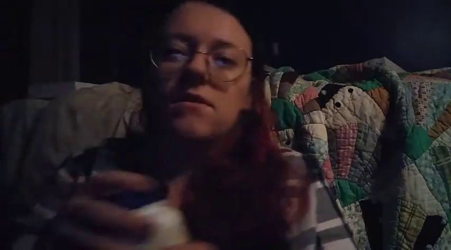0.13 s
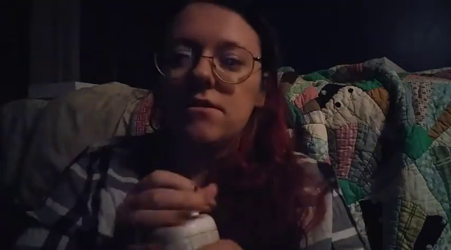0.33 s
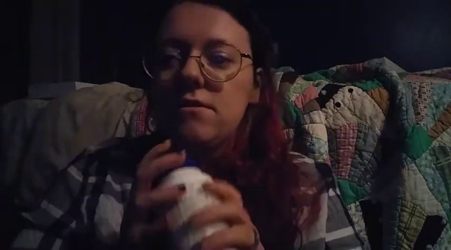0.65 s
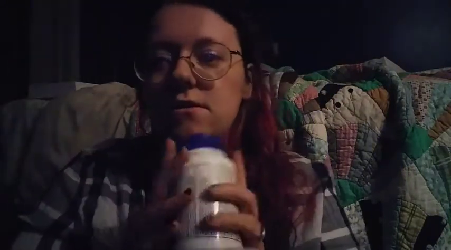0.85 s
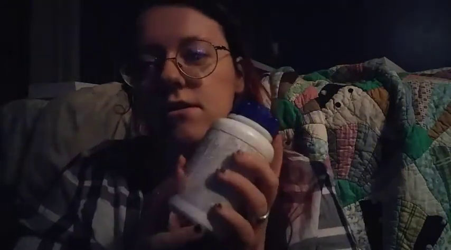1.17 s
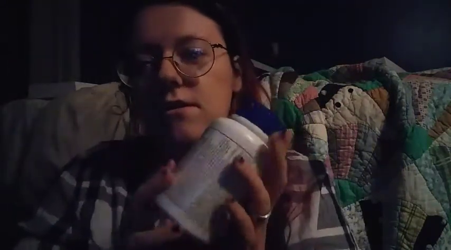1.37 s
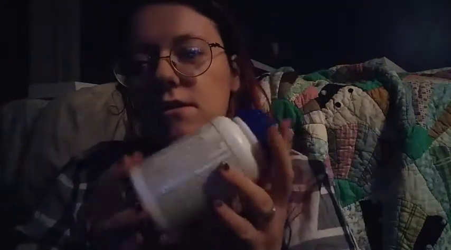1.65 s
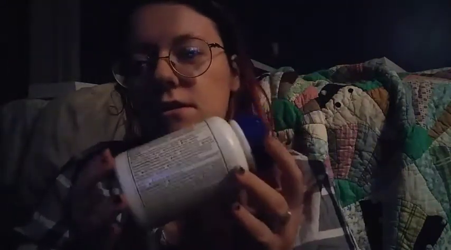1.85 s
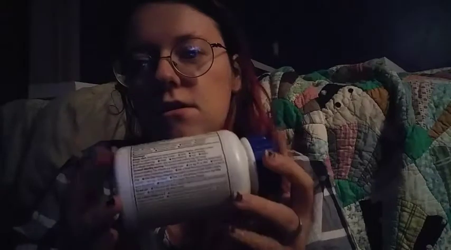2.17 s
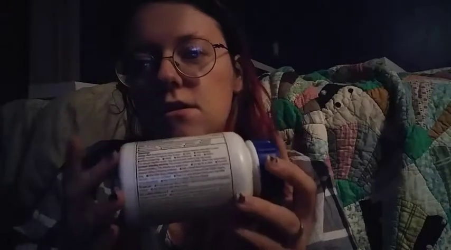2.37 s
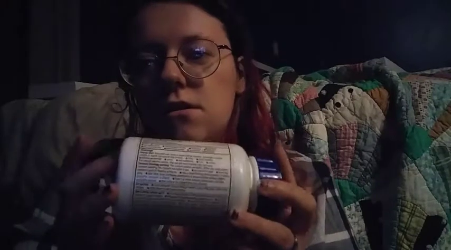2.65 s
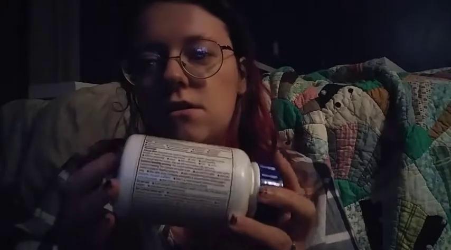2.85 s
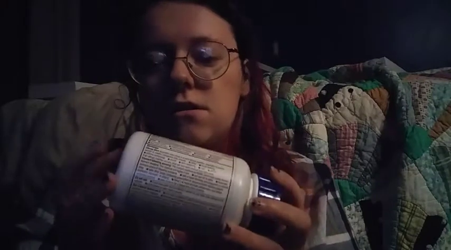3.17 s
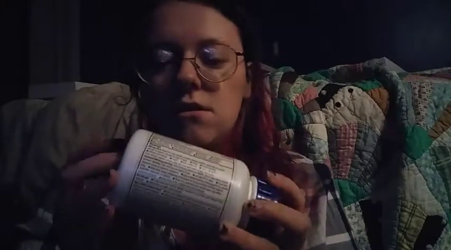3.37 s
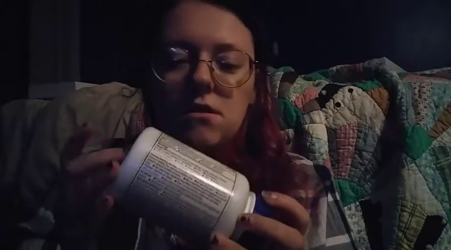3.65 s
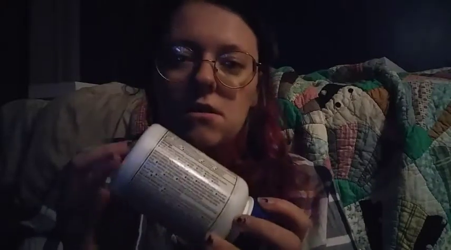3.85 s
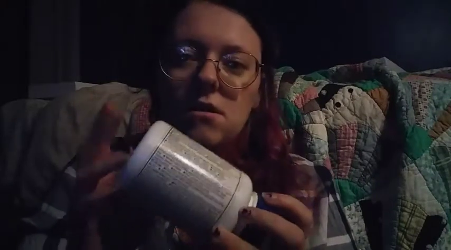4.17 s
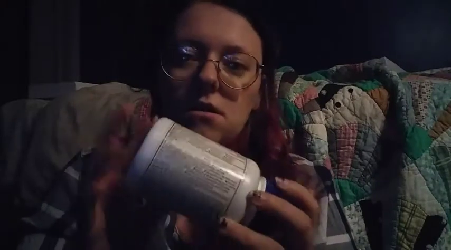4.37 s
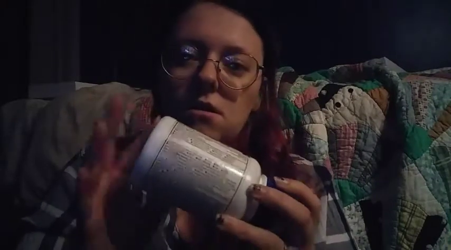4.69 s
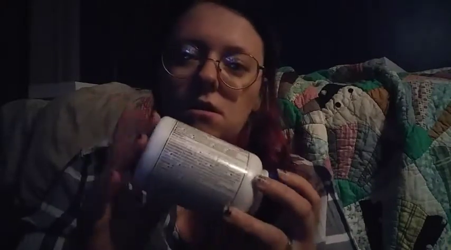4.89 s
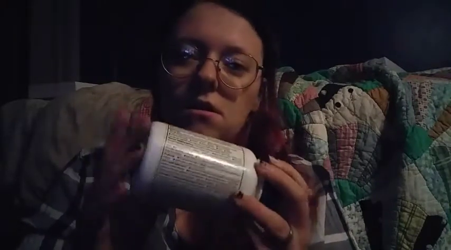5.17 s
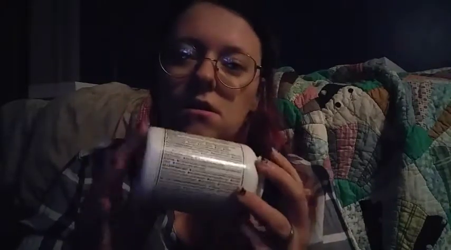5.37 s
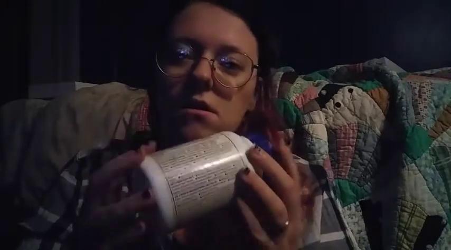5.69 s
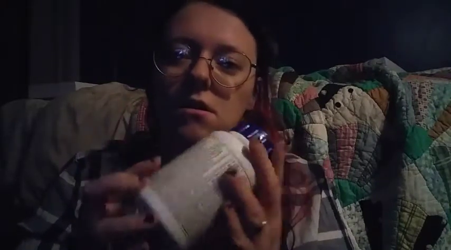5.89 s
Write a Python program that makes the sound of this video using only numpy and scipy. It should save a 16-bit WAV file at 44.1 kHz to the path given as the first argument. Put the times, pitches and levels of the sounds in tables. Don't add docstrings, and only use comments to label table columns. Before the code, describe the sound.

A laptop-type microphone catches fingers and nails on a hard plastic bottle of pills. It knocks, ticks and rattles as it is turned, label skin-noise rasping in short strokes. Later the base drums with hollow mid-pitched taps, one sharp and loud. The handling thins to tiny clicks before a last burst. Low fan noise pulses through a noise gate, with a very short dull room tail.

```python
import sys
import numpy as np
from scipy import signal
from scipy.fft import rfft, irfft
from scipy.io import wavfile
from scipy.ndimage import uniform_filter1d

SR = 44100
rng = np.random.default_rng(int(sys.argv[2]) if len(sys.argv) > 2 else 0)


def linear_from_db(decibels):
    return 10 ** (np.asarray(decibels, float) / 20)


def unload_wav(signal):
    wavfile.write(
        sys.argv[1],
        SR,
        np.round(np.clip(np.atleast_2d(signal).T, -1, 1) * 32767).astype(np.int16),
    )


N = 265923


def at(table, column):
    rows = np.array(table)
    return np.interp(np.arange(N) / SR, rows[:, 0], rows[:, column])


def colour(x, points):
    hz, db = np.transpose(points)
    f = np.fft.rfftfreq(len(x), 1 / SR) + 1
    gain_db = np.interp(np.log(f), np.log(hz), db)
    y = irfft(rfft(x) * linear_from_db(gain_db), len(x))
    return y / np.std(y)


def response(points):
    hz, db = np.transpose(points)
    f = np.fft.rfftfreq(2048, 1 / SR) + 1
    gain_db = np.interp(np.log(f), np.log(hz), db)
    cepstrum = irfft(np.log(linear_from_db(gain_db)))
    cepstrum[1:1024] *= 2
    cepstrum[1025:] = 0
    return irfft(np.exp(rfft(cepstrum)))[:512]


def walk(rate_hz):
    hold = int(SR / rate_hz)
    levels = np.repeat(rng.standard_normal(N // hold + 1), hold)
    return uniform_filter1d(levels, hold)[:N]


def modes(hz, db, t60_s, phase_cycles):
    t = np.arange(2048)[:, None] / SR
    sines = np.sin(2 * np.pi * (hz * t + phase_cycles))
    y = (linear_from_db(db - 60 * t / t60_s) * sines).sum(axis=1)
    return y / np.abs(y).max()


def add(out, start_s, sound):
    i = max(int(start_s * SR), 0)
    out[i:i + len(sound)] += sound[:max(len(out) - i, 0)]


ROOM_T60_S, ROOM_DB = 0.14, -11


def room(x, db):
    t = np.arange(8192) / SR
    tail = colour(rng.standard_normal(8192), [(200, -17.5), (1500, -6.5), (6000, -5.0), (12000, -4.0)])
    tail = tail * linear_from_db(-60 * t / ROOM_T60_S) * np.clip(t / 0.014, 0, 1)
    tail = tail / np.sqrt(np.sum(tail ** 2))
    return x + linear_from_db(db) * signal.fftconvolve(x, tail)[:N]


# hz, density_db (per Hz)
FAN_SPECTRUM = [(25, -39), (50, -20), (70, -4.5), (125, 0.5), (280, -3.5), (490, -1.5), (800, -6),
                (1400, -12), (2000, -14.5), (3000, -16), (6500, -22.5), (9000, -49), (15500, -56.5)]
# hz, density_db (per Hz)
DUCT_RESONANCE = [(1430, -21.5), (1600, 2), (1680, 5.5), (1760, -2.5), (1950, -27.5)]
# time_s, level_above_fan_db
WHISTLE_LEVEL = [(0, -16), (.8, -4), (.95, -10.5), (1.2, -8.5), (1.45, -3.5), (1.6, -8), (1.8, -15.5),
                 (2.4, -4), (2.5, -15), (2.7, -12), (2.8, -6), (3.1, -18), (3.2, -3.5), (3.6, -4.5),
                 (3.7, -15.5)]
# time_s, fan_db
FAN_LEVEL = [(0, -68), (.2, -61), (.3, -62), (.42, -70.5), (.6, -59.5), (1.5, -61.5), (2.0, -61.5),
             (2.1, -60.5), (2.45, -59), (2.6, -63), (2.7, -61), (3.05, -57), (3.2, -61), (4.3, -58),
             (4.5, -64), (5.45, -66), (5.6, -64.5), (6.0, -61.5)]


def fan():
    hum = colour(rng.standard_normal(N), FAN_SPECTRUM)
    whistle_db = at(WHISTLE_LEVEL, 1) + 1.1 * walk(22)
    whistle = linear_from_db(whistle_db) * colour(rng.standard_normal(N), DUCT_RESONANCE)
    fan_db = at(FAN_LEVEL, 1) + 3.0 + 1.48 * walk(25)
    return linear_from_db(fan_db) * (hum + whistle)


# start_s, length_s, rub_db
STROKES_OF_HANDS = [(0.116, 0.17, -61.5), (0.448, 0.063, -87), (0.587, 0.035, -51.5), (0.886, 0.031, -61.5),
                    (1.045, 0.058, -62), (0.757, 0.66, -61.5), (1.485, 0.18, -69.5), (1.7, 0.058, -63.5),
                    (1.844, 0.046, -68.5), (2.102, 0.25, -52.5), (2.146, 0.13, -46), (2.38, 0.05, -75),
                    (2.66, 0.092, -67), (2.86, 0.09, -60), (3.072, 0.012, -56.5), (3.603, 0.11, -66),
                    (3.812, 0.1, -52), (4.093, 0.22, -63.5), (4.346, 1, -74.5), (5.594, 0.021, -55.5),
                    (5.64, .3, -68), (5.98, .1, -51)]
STROKE_RISE_DB_S, STROKE_FALL_DB_S, RESTING_DB = 211, 150, -81.5


def hands():
    t, power = np.arange(N) / SR, linear_from_db(2 * RESTING_DB)
    for start_s, length_s, rub_db in STROKES_OF_HANDS:
        rise_db = STROKE_RISE_DB_S * np.maximum(start_s - t, 0)
        fall_db = STROKE_FALL_DB_S * np.maximum(t - start_s - length_s, 0)
        power = power + linear_from_db(2 * (rub_db - (rise_db + fall_db)))
    return 10 * np.log10(power)


# hz, density_db (per Hz)
SKIN_HISS = [(700, -9.5), (1500, 10.5), (2500, 3), (4000, 3), (6000, 5), (8000, -0.5), (10000, -5),
             (12000, -43), (15500, -41)]
# hz, density_db (per Hz)
SLIP_GRAINS = [(900, -3), (1650, 1.5), (2300, 0.5), (3300, 2), (5000, -22), (6900, -22.5), (9000, -27),
               (12000, -42.5), (15500, -57.5)]
CUPPED_S = 2.9


def rub():
    db = hands()
    hiss = colour(rng.standard_normal(N), SKIN_HISS) * linear_from_db(2.3 * walk(30))
    slips = (rng.random(N) < 700 / SR) * linear_from_db(2.5 * rng.exponential(size=N))
    slip_decay = linear_from_db(-60 * np.arange(512) / SR / 0.044)
    slips = np.convolve(slips, slip_decay)[:N] * rng.standard_normal(N)
    share = np.clip((db + 58) / 10, 0, .85)
    hollow = colour(rng.standard_normal(N), [(620, -20.5), (860, 3), (1150, -22)]) * linear_from_db(3.9 * walk(45))
    hollow *= linear_from_db(-70 + .55 * (db + 59.5)) * (np.arange(N) / SR > CUPPED_S)
    friction = np.sqrt(1 - share) * hiss + np.sqrt(share) * colour(slips, SLIP_GRAINS)
    return hollow + linear_from_db(db) * friction


# pitch_hz, level_db, t60_s
SHELF_MODES = [(586, 7, 0.085), (800, -16, .05), (1080, 7, 0.054), (1340, 11.5, 0.025), (5100, 5, 0.032),
               (5200, 5, 0.045), (5600, 1, 0.051), (6400, -15, 0.022)]


def shelf():
    out = np.zeros(N)
    add(out, .1238, linear_from_db(-27.5) * modes(*np.transpose(SHELF_MODES), 0))
    return out


# start_s, peak_db, pitch_hz, low_knock_relative_db
BASE_TAPS = [(0.124, -30, 778, -7.5), (4.155, -38, 850, -32), (2.823, -25.5, 920, -11),
             (2.93, -35, 855, -13), (3.113, -25.5, 878, -8), (3.314, -33.5, 894, 0.5),
             (3.4486, -14, 872, -14.5), (3.672, -33, 877, -32.5), (3.798, -35, 870, -30),
             (3.924, -38, 730, -23), (3.955, -37.5, 800, -13.5), (4.035, -44, 770, -14),
             (4.082, -32.5, 800, -29), (4.102, -29, 800, -34), (4.21, -38.5, 820, -23),
             (4.334, -41, 853, -8), (4.551, -44, 810, -15), (4.643, -54, 810, -16), (4.819, -53, 820, -10),
             (4.893, -44, 830, -11), (4.990, -49, 830, -11), (5.151, -45.5, 887, -28),
             (5.347, -58, 800, -20), (5.572, -33.5, 820, -40), (5.605, -34, 800, -32),
             (5.629, -33.5, 870, -17), (5.893, -35, 925, -30), (5.959, -20, 926, -44),
             (2.946, -37, 890, -21), (2.962, -43, 800, -20), (4.667, -46.5, 830, -17),
             (5.2185, -55, 850, -13), (5.652, -41.5, 810, -9), (5.768, -57, 800, -19),
             (5.85, -45.5, 866, -22), (5.953, -36, 790, -30), (0.2671, -44, 434, -12),
             (6.029, -45, 900, -30), (6.012, -27, 990, -27), (6.02, -26, 960, -42),
             (2.688, -45.5, 1040, -27), (2.698, -40.5, 985, -25), (2.738, -45, 634, -18),
             (2.993, -40, 850, -22)]
NAIL = 2.23


def fingertips():
    out = np.zeros(N)
    t = np.arange(2048) / SR
    for start_s, peak_db, pitch_hz, knock_db in BASE_TAPS:
        soft = np.clip((-20 - peak_db) / 12, 0, 1)
        hz = np.array([pitch_hz, 825. + 45 * rng.standard_normal(), 420.,
                       pitch_hz * (0.757 + 0.3 * rng.random())])
        db = np.array([0, -24 + 10 * soft, knock_db, -9])
        t60_s = np.array([0.016 + 0.014 * soft, 0.063 + 0.015 * soft, .02, .018])
        drum = modes(hz, db, t60_s, 0.24 * (1 - soft))
        drum *= np.clip(t / (.0002 + .0012 * soft), 0, 1)
        drum[2:12] += NAIL * (1 - soft) ** 2 * np.diff(np.hanning(11))
        add(out, start_s + 0.001095 - 0.00051 * soft, linear_from_db(peak_db + 3.0) * drum)
        settle_s = 0.017 * (.5 + rng.random())
        add(out, start_s + settle_s, linear_from_db(peak_db - 12) * soft * drum)
    return out


STRIKE = 9


def snap(part, t60_s):
    shake = rng.standard_normal(1536) * linear_from_db(-60 * np.arange(1536) / SR / t60_s)
    shake[0] = STRIKE
    burst = np.convolve(part, shake)
    return burst / np.sqrt(np.mean(burst[:60] ** 2))


# pitch_hz, level_db, t60_s
PANELS = [(1550, -8.5, 0.033), (1664, 5, .045), (2140, -6, 0.017), (2893, 2.5, 0.044), (3190, -9, 0.024),
          (3580, 9.5, 0.023), (4080, -4, 0.018), (4730, 0, 0.045), (7100, -11.5, 0.02), (7170, -10, .03)]
PANELS_DB, PANEL_SCATTER_DB, PANEL_DETUNE = -5, 4.5, .03


def tick(parts, ring_db, edge_db):
    wall, ring, edge = parts
    hz, db, t60_s = np.transpose(PANELS)
    detune, size, phase = rng.standard_normal((3, len(hz)))
    tilt_db = np.where(hz < 2400, ring_db, np.where(hz > 6000, edge_db, 0))
    db = db + PANEL_SCATTER_DB * size + tilt_db
    sound = snap(wall, 0.015)
    sound = sound + linear_from_db(ring_db - 2.26) * snap(ring, 0.019)
    sound = sound + linear_from_db(edge_db - 3.5) * snap(edge, 0.023)
    panels = modes(hz * (1 + PANEL_DETUNE * detune), db, t60_s, phase)
    return sound + linear_from_db(PANELS_DB) * panels[:len(sound)]


# hz, density_db (per Hz)
WALL_SNAP = [(600, -43), (1800, -25.5), (2400, -1.5), (3400, 0.5), (4300, -2), (5200, -2), (6200, -14),
             (12000, -56)]
WALL_RING = [(500, -47), (1150, -8), (1400, 3.5), (1700, 8), (2100, 4.5), (2700, -15), (8000, -42)]
WALL_EDGE = [(2000, -51), (4800, -15), (5800, -2), (6900, -5), (8200, -9.5), (10500, -20), (12500, -34.5),
             (15500, -51.5)]
# start_s, snap_db,
# ring_relative_db, edge_relative_db
WALL_TICKS = [(0.1242, -34.5, -2.5, 1.5), (0.2662, -41, 0.5, -4.5), (.5188, -49.5, 2, -17),
              (0.5482, -45.5, 12.5, 8), (0.5536, -31, -16, -9), (0.583, -23.5, -6, 1.5),
              (0.606, -25.5, -4.5, -3.5), (0.633, -29, -3.5, -6.5), (0.681, -43, 4, -15),
              (.709, -39, -3, -19), (.719, -36.5, -3, -13), (0.7546, -29, -10, -6),
              (0.818, -36.5, -5.5, -6), (1.6516, -38, 2, -4), (1.6875, -23.5, 1.5, -2),
              (1.7203, -50, 6, -6), (1.693, -39, -2, -3), (1.700, -37, -3.5, -4.5), (1.708, -52, -9, -6),
              (1.756, -51, 8, -6), (1.97, -64, -4.5, -16), (1.98, -56, 9.5, -15), (1.729, -42.5, 7.5, -4),
              (1.8263, -37.5, -1, 4), (1.948, -43.5, 3.5, -24), (.425, -56.5, 3, -4), (.455, -62, 5, -15),
              (.475, -64, 7, -15), (.51, -55, 6, -5), (.527, -61, -5, -15), (.54, -55, 0, -14),
              (.658, -56, -6, -19), (.695, -51, -10, -12), (.735, -48, 7, -15), (.77, -61, -8, -10),
              (2.0437, -19, -7.5, -3), (2.062, -36.5, 4.5, -1), (2.07, -33, -0.5, -23),
                (2.101, -36.5, 6.5, -20.5), (2.1233, -21, -7, -2), (2.1393, -19, -2, 3),
                (2.1419, -22, -5.5, -10), (2.1659, -23.5, -6.5, 1.5), (2.1843, -20, -4.5, -3),
                (2.2036, -24.5, -5.5, -1.5), (2.208, -21.5, -15, -3), (2.2173, -39, 9, -18),
                (2.226, -20.5, -12, -7), (2.253, -32, -12, -19), (2.2927, -31, -5, -1),
                (2.3056, -30.5, -6, -4), (2.325, -41, -9, -17.5), (2.3558, -47, 10, -24),
                (2.3806, -43, 10, -25), (2.3914, -24.5, -5, -5.5), (2.4192, -34.5, -21, -31),
                (2.035, -49.5, 13, -26), (2.052, -39, 10, -15.5), (2.0775, -35, 3.5, -18),
                (2.098, -45.5, -1.5, -19), (2.111, -46, 6, -18), (2.133, -38, -4.5, -14.5),
                (2.2568, -31, -10, -15), (2.272, -46, 11, -14), (2.285, -43, -7, -16), (2.299, -37, 1, -6),
                (2.314, -40, -4, -15), (2.327, -40, -5, -19), (2.362, -43, 6, -18), (2.388, -43.5, 6, -20),
                (2.409, -53, -11, -11), (2.425, -43, 6, -22.5), (2.476, -48, -3, -0.5),
                (2.483, -47, -8, -10), (2.523, -54.5, -0.5, -17), (2.6, -55, 10, -7), (2.643, -52, -1, -25),
                (2.4452, -35.5, -11, -31), (2.5086, -47.5, 2.5, -7),
              (2.6569, -33.5, -10, -19), (2.687, -32.5, -3, -17), (2.6963, -35.5, -1, -21),
                (2.728, -33.5, -8, 1), (2.8237, -30, -12, -0.5), (2.876, -31, -7, -6.5),
                (2.921, -42, 2, -21), (2.992, -47, 7, -17), (3.0036, -30, 0.5, -2.5),
                (3.0109, -29, 2.5, -6.5), (3.0338, -40, -10, -12), (2.662, -48.5, 2, 5),
                (2.737, -46.5, 8, -10), (2.751, -51, 10, -10), (2.7777, -52, 10.5, -25),
                (2.978, -46, 9, -18), (3.09, -40.5, -1, -12), (3.093, -40.5, 5, -15), (3.13, -50, 1, -8),
                (3.146, -59, 5, -10), (3.057, -38.5, 2.5, -20), (3.068, -33.5, -0.5, -7),
                (3.114, -31, -8, 0.5), (3.314, -49.5, 9, -31), (3.4492, -29.5, -3, 12.5),
                (3.6747, -45, -1, -1), (3.6973, -46, -1, -4), (3.734, -44, -9, -7), (3.751, -46, -6, -23),
              (3.7954, -35.5, -2.5, -26), (3.8062, -38, -28, 6), (3.81, -26.5, -8, 4.5),
                (3.854, -28.5, -26.5, -29.5), (3.8578, -29.5, -14, 7), (3.878, -28, -11.5, -3),
                (3.885, -33, -14, -15), (3.893, -32.5, -12, -3), (3.909, -43, -3.5, -11.5),
                (3.9176, -28.5, -5.5, 3), (3.924, -30, -27.5, 3), (3.9396, -38, -28, -5),
                (3.9556, -35, -1.5, 3), (3.9996, -41.5, 5.5, -13.5), (4.009, -27.5, -18, -1),
                (4.029, -42, -22.5, -19), (4.0345, -27, -6, 0.5), (4.081, -26.5, 2.5, 6.5),
                (4.0833, -22, -9.5, 6), (4.1051, -20.5, -3.5, 7.5), (4.118, -47, -23, 20),
                (3.8148, -41, -6, -3), (3.821, -42, -10, -8), (3.898, -44, -9.5, -10),
                (3.948, -37.5, -10, -3), (4.047, -46, -5, -4.5), (4.063, -47.5, 11.5, -10),
                (4.087, -39.5, -2.5, -4), (4.112, -48.5, -7, -4.5), (4.128, -40.5, -7, -1.5),
                (4.209, -38, 1, 1), (4.236, -48, -9, 8), (4.1966, -33.5, -4, 4.5), (4.213, -30.5, -8, -3),
                (4.218, -30, -4.5, 5.5), (4.2258, -52, -15, 14), (4.253, -41.5, -6, -4),
                (4.2828, -45, -1, 0), (4.3003, -50, -9, -26), (4.333, -41.5, 0, -4.5),
                (4.357, -41.5, -2, -23),
              (4.457, -50.5, 2, 4), (4.479, -46, -10, -2), (4.516, -50.5, -13, 2), (4.5505, -53, -10, 7),
                 (4.641, -56, -8, 6), (4.6486, -47.5, -4, -7), (4.8195, -59, -2, -12), (4.9414, -56, 7, -3),
                 (4.9895, -55.5, -18, 9.5), (5.3385, -59, -4, 1), (5.347, -64, 0, -10),
                 (5.5036, -52, -13, -0.5), (5.539, -53, -10, -5), (5.65, -48.5, 0, -12),
                 (5.972, -47, -5, -3), (6.029, -35, -5, 4), (4.8914, -42.5, -12, 0.5),
                 (5.1497, -40.5, 1, -2), (5.2195, -53.5, -12, 7), (5.5723, -39, -23, -15),
                 (5.6038, -43.5, 6, -17), (5.628, -42, -2, -21), (5.782, -53.5, -22, -23),
                 (5.878, -49, 4, 1), (5.887, -39.5, -4, 0), (5.959, -17, -4, 3), (5.986, -44, -16, -10),
                 (6.001, -41, -7, 12), (6.014, -29.5, 0, -5), (6.021, -23, -6, -0.5)]
TICKS = WALL_TICKS
BOUNCE_S, BOUNCE_DB, BOUNCE_SCATTER_DB = .022, -25, 6.5
BOUNCE_RING_DB, BOUNCE_EDGE_DB = 0, -6.5


def pills():
    out = np.zeros(N)
    parts = [response(points) for points in (WALL_SNAP, WALL_RING, WALL_EDGE)]
    for (start_s, db, ring_db, edge_db), (late, size) in zip(TICKS, rng.random((len(TICKS), 2))):
        add(out, start_s, linear_from_db(db - 4.5) * tick(parts, ring_db, edge_db))
        bounce_db = db + 2.5 + BOUNCE_DB + BOUNCE_SCATTER_DB * (2 * size - 1)
        bounce = linear_from_db(bounce_db) * tick(parts, BOUNCE_RING_DB, BOUNCE_EDGE_DB)
        add(out, start_s + BOUNCE_S * (.3 + late), bounce)
    return out


# closes_s, opens_s, depth_db
GATE_PAUSES = [(0, 0.03, -9.5), (0.076, 0.126, -11), (0.328, 0.394, -11), (1.558, 1.608, -10.5),
               (1.61, 1.633, -3.5), (1.933, 1.967, -9), (2.55, 2.575, -6), (3.601, 3.662, -4),
               (4.406, 4.459, -7), (4.522, 4.56, -12.5), (4.592, 4.639, -13.5), (4.705, 4.75, -12.5),
               (4.744, 4.78, -5), (4.766, 4.821, -14.5), (4.847, 4.895, -12.5), (4.986, 4.991, -11),
               (5.05, 5.153, -12), (5.193, 5.221, -6), (5.27, 5.339, -11.5), (5.365, 5.41, -5),
               (5.406, 5.447, -16.5), (5.45, 5.511, -10.5), (5.689, 5.731, -10.5), (5.729, 5.751, -6.5),
               (2.558, 2.66, -6.5)]
SINK_S, SINK_SHARE = 0.0083, 0.092


def gate():
    t, db = np.arange(N) / SR, np.zeros(N)
    for closes_s, opens_s, depth_db in GATE_PAUSES:
        fall = (1 - SINK_SHARE) * np.clip((t - closes_s) / 0.0069 + 1.25, 0, 1)
        sink = 2 * SINK_SHARE * np.clip((t - closes_s) / SINK_S, 0, 1)
        db += depth_db * (fall + sink) * np.clip((opens_s - t) / 0.004, 0, 1)
    return linear_from_db(db * (1 + .3 * walk(60)))


# end_s, depth_db
ONSET_DIPS = [
    (1.684, -30),
    (1.823, -10),
    (4.076, -25),
    (4.636, -18),
    (4.888, -20),
    (4.983, -14),
    (5.147, -18),
    (5.213, -14),
    (5.955, -12),
]
ONSET_DIP_S = .008
DUCK_S, DUCK_OVER_DB, DUCK_PER_DB = .011, -40, -1


def duck():
    db, last_s = np.zeros(N), 0
    for start_s, tick_db, *_ in sorted(TICKS):
        if start_s - last_s > 2 * DUCK_S:
            dip = slice(int((start_s - DUCK_S) * SR), int(start_s * SR) - 200)
            db[dip] = DUCK_PER_DB * max(tick_db - DUCK_OVER_DB, 0)
        last_s = start_s
    for end_s, depth_db in ONSET_DIPS:
        db[int((end_s - ONSET_DIP_S) * SR):int(end_s * SR)] += depth_db
    return linear_from_db(uniform_filter1d(db, size=40))


# hz, gain_db
BASE_COLOUR = [(640, 1), (830, 10.5), (1080, 3), (2400, -3), (3000, 3.5), (3600, 1.5), (4400, -5),
               (5900, -4.5), (6800, -0.5), (7500, -4), (8800, -5)]
TURN_S = 3.3
SPLIT_HZ = 1400


def scene():
    bottle = room(pills() + shelf(), ROOM_DB) + rub()
    turned = np.clip((np.arange(N) / SR - TURN_S) * 10, 0, 1)
    facing = np.convolve(bottle, response(BASE_COLOUR))[:N]
    bottle = (1 - turned) * bottle + turned * facing
    mono = bottle + room(fingertips(), ROOM_DB - 2) + fan()
    mono = mono * gate()
    lows = signal.sosfiltfilt(signal.butter(2, SPLIT_HZ, fs=SR, output="sos"), mono)
    mono = lows + (mono - lows) * duck()
    return np.array([mono, mono])


BUSY_DB, SPRAY_DB = -69, -30


def treble_gate(x):
    hz, s, z = signal.stft(x, SR, nperseg=768)
    power = uniform_filter1d(np.abs(z) ** 2, size=14, axis=0, mode="nearest")
    limit_db = np.interp(hz, [6650, 7660, 10980, 12130, 15800], [-125, -96.5, -97.5, -84.0, -93.0])
    treble = power[hz > 2000].mean(axis=0)
    ease = np.minimum(uniform_filter1d(treble, size=5) / np.quantile(treble, .3), 1)
    audible = power > linear_from_db(2 * limit_db)[:, None] * ease
    kept = np.maximum.accumulate(audible[::-1], axis=0)[::-1]
    attack = treble > linear_from_db(15) * np.roll(treble, 2)
    spare = (ease < .8) & (np.interp(s * SR, np.arange(N), walk(35)) > .55)
    rising = treble > linear_from_db(9) * np.roll(treble, 1)
    busy = uniform_filter1d(1. * rising, size=5, origin=2) > 0
    busy &= treble > linear_from_db(2 * BUSY_DB)
    kept |= busy
    spray = rng.standard_normal(z.shape) + 1j * rng.standard_normal(z.shape)
    steady = np.median([treble, np.roll(treble, 1), np.roll(treble, -1)], axis=0)
    z = z + linear_from_db(SPRAY_DB) * spray * busy * np.sqrt(steady) * (hz > 9500)[:, None]
    kept |= attack | (np.roll(attack, 1) | spare) & (hz < 12600)[:, None]
    return signal.istft(z * kept * (hz < 15800)[:, None], SR, nperseg=768)[1][:N]


def top_cut(x):
    return signal.sosfilt(signal.butter(12, 16480, fs=SR, output="sos"), x)


JOLT_DB = -32


def record(dry):
    mono = signal.sosfilt(signal.butter(1, 110, "high", fs=SR, output="sos"), dry[0])
    mono = treble_gate(mono)
    jolt = np.sqrt(uniform_filter1d(mono ** 2, size=1024).clip(0)) * rng.standard_normal(N)
    jolt = signal.sosfilt(signal.butter(2, 60, fs=SR, output="sos"), jolt)
    mono = mono + linear_from_db(JOLT_DB + 18.5) * jolt
    grit = linear_from_db(-13) * mono * uniform_filter1d(rng.standard_normal(N), size=48)
    grit = signal.sosfilt(signal.butter(6, 11500, fs=SR, output="sos"), grit)
    grit = linear_from_db(2.0) * signal.lfilter([1, -.55], 1, grit)
    return top_cut(np.array([mono + grit, mono - grit]))


dry = scene()
out = record(dry)
unload_wav(out)
```